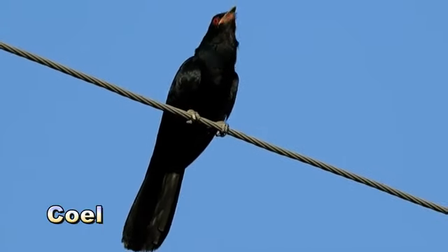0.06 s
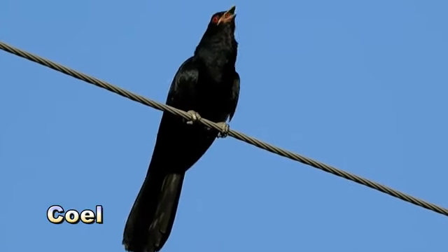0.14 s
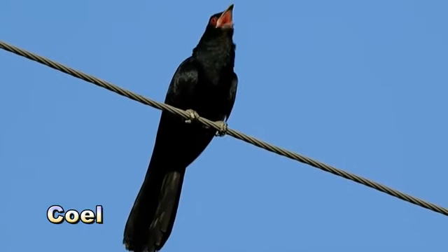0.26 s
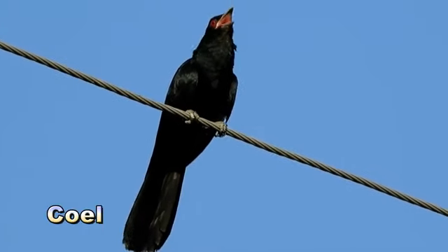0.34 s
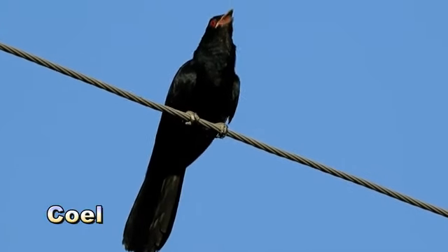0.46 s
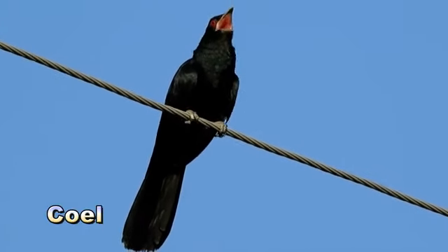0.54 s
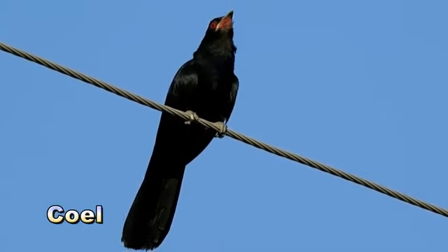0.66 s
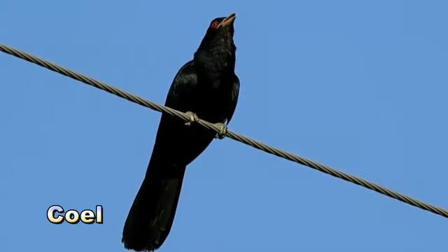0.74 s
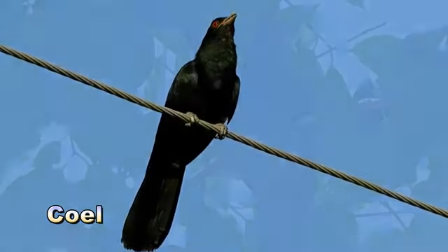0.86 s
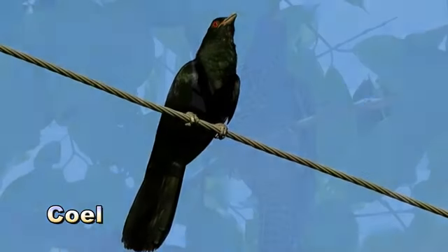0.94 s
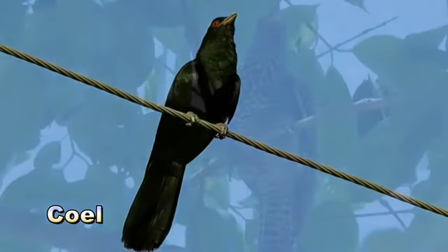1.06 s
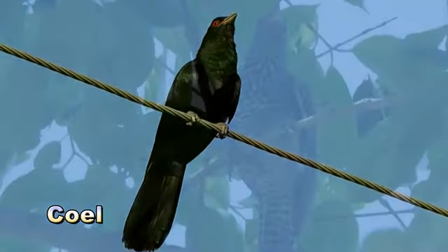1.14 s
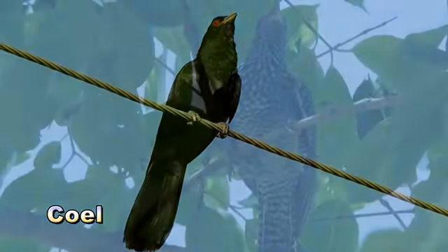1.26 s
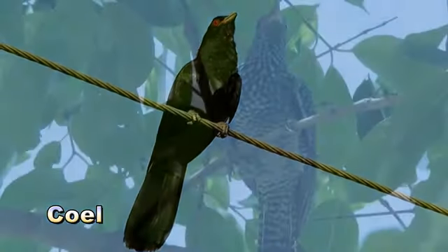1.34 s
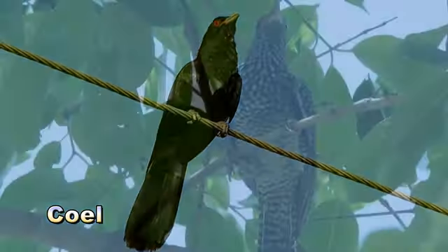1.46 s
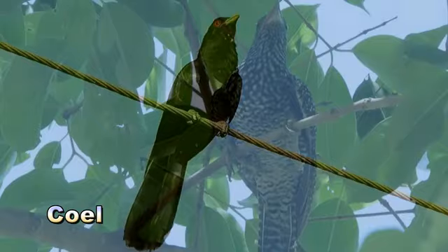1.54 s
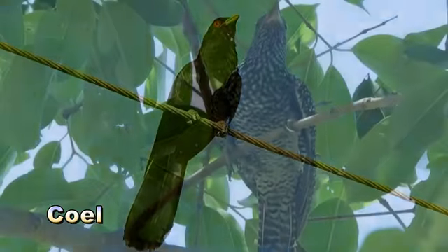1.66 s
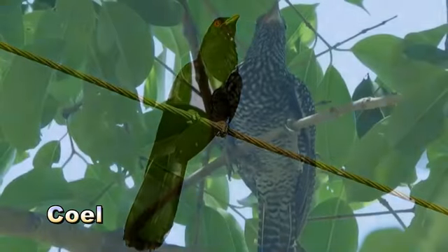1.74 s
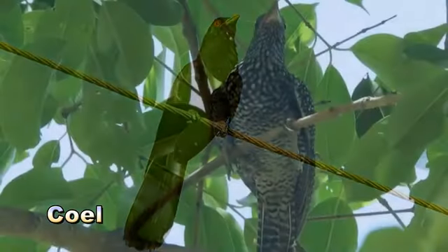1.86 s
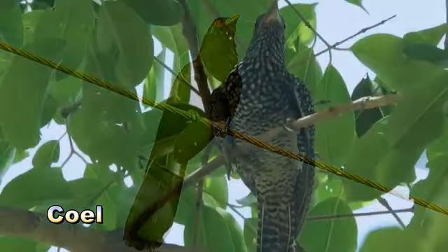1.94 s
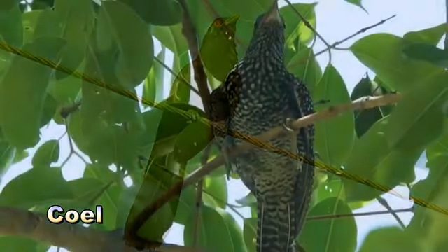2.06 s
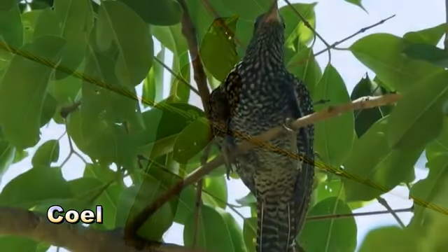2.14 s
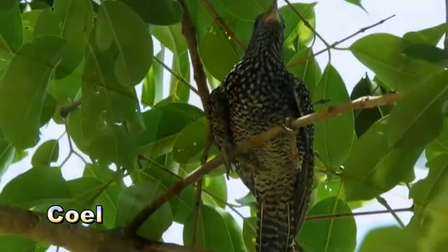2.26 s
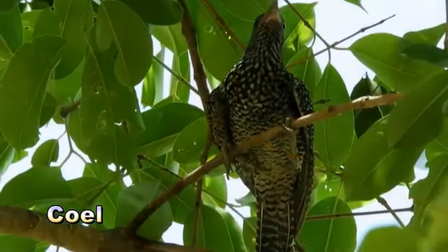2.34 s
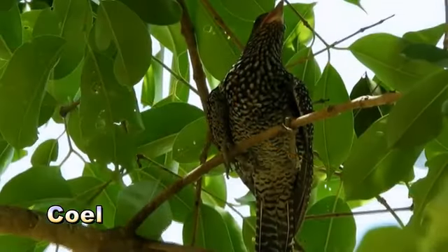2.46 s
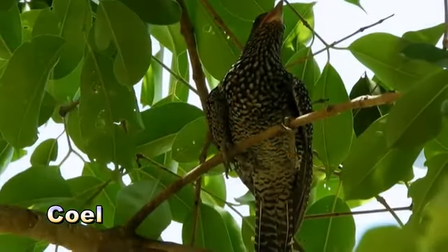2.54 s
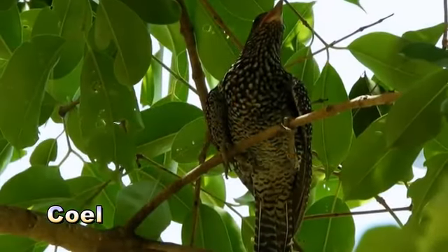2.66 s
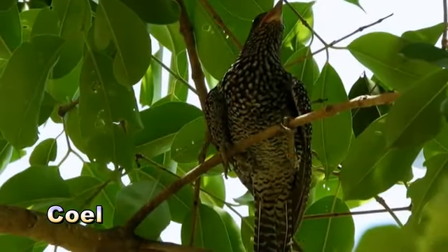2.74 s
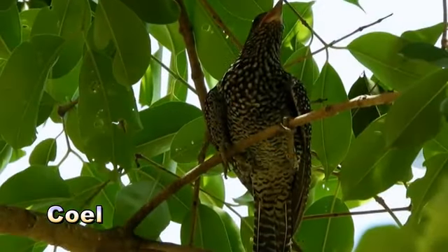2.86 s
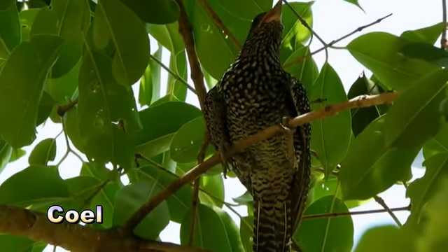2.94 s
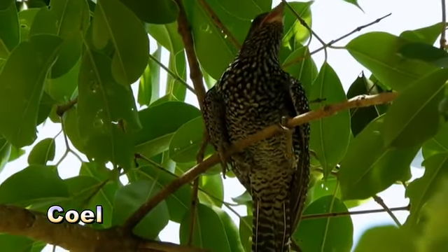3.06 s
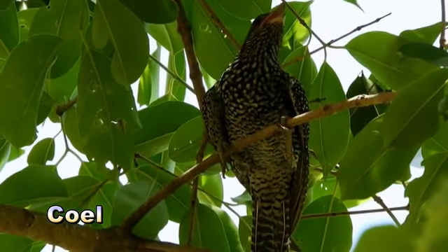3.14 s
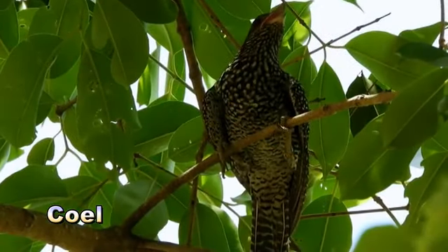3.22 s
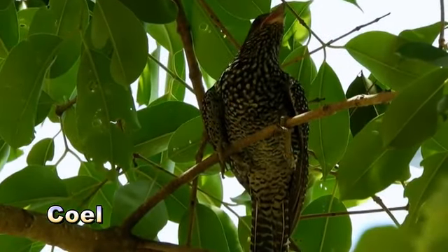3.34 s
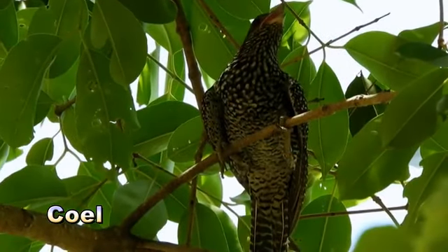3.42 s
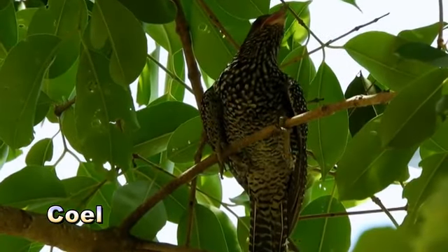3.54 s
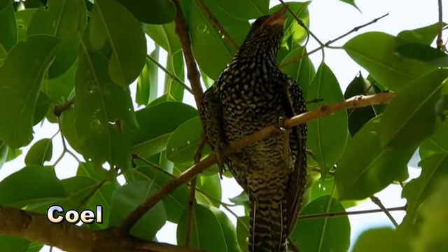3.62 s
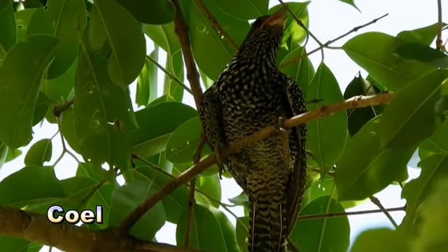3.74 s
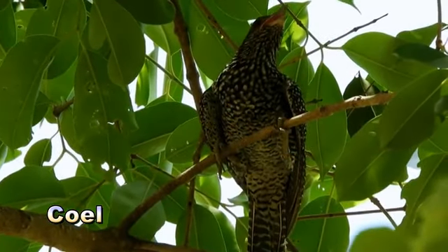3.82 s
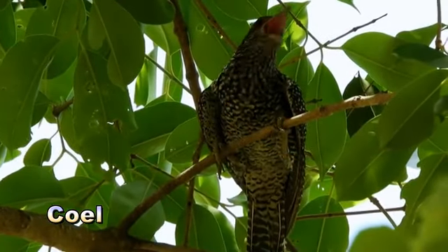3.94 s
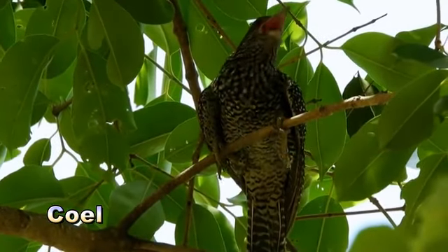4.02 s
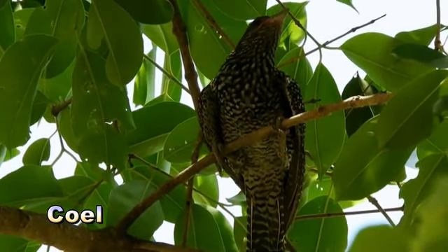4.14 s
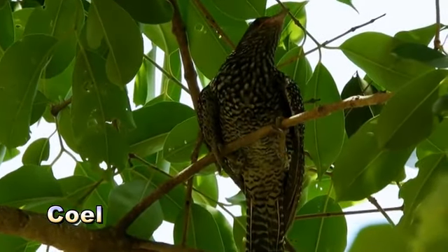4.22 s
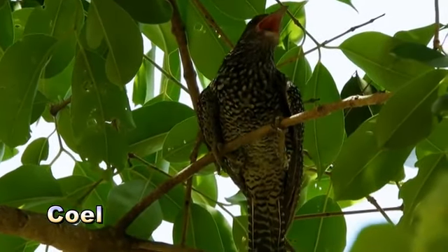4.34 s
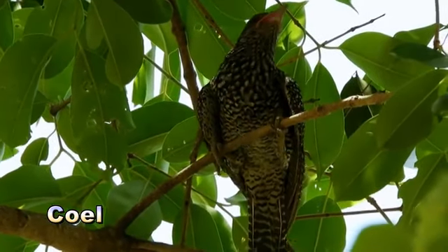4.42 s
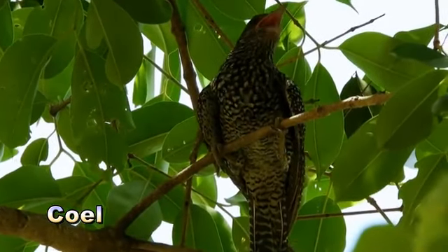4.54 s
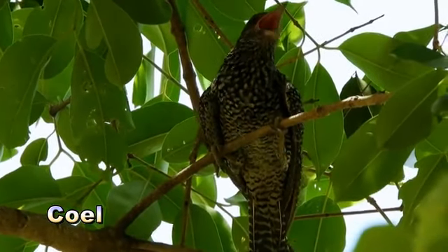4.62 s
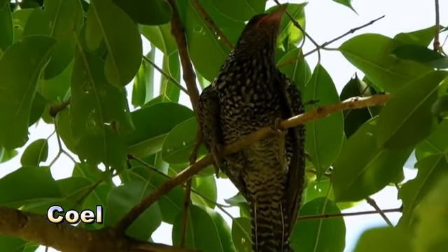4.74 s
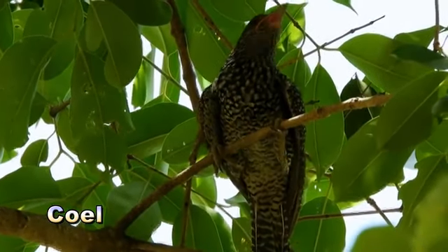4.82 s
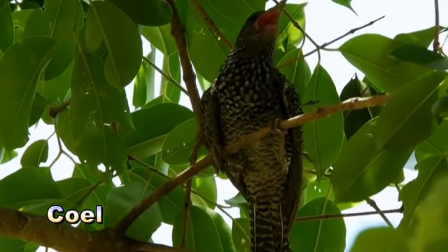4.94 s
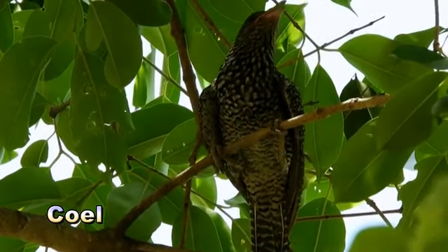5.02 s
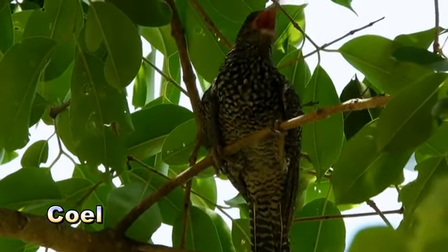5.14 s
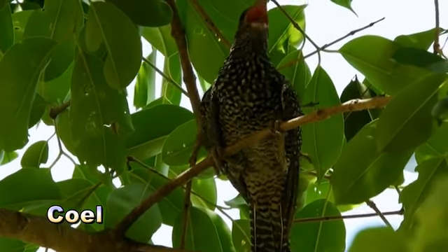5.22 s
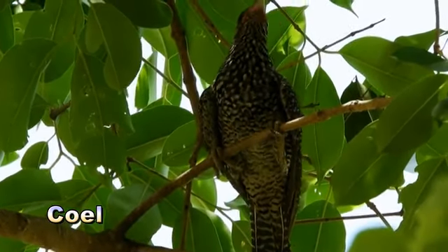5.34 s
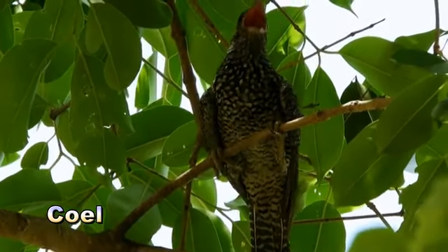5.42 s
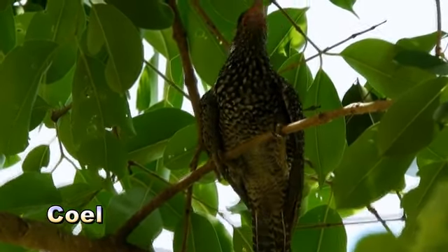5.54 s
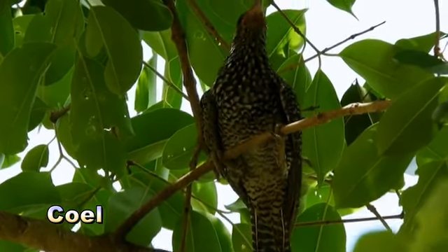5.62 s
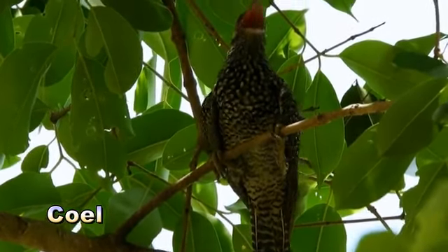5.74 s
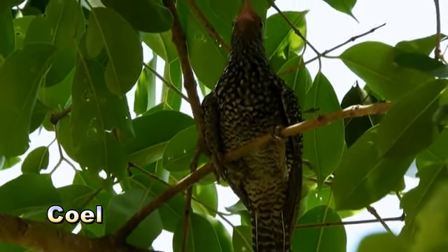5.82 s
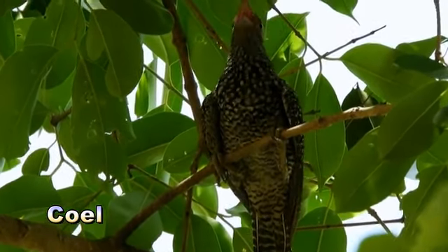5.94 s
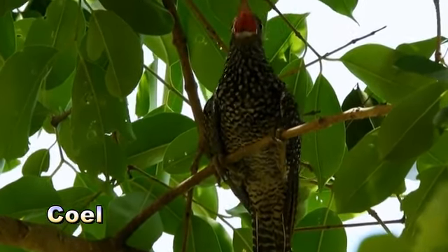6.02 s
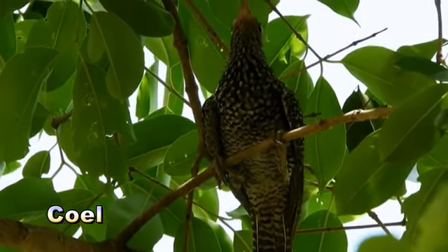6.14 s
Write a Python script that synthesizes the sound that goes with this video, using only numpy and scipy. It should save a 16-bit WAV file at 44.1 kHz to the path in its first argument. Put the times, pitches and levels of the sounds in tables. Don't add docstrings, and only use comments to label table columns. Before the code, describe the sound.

Outdoors, a loud cuckoo gives four clear two-note whistles, each slightly higher, echoing off nearby walls over a throbbing insect hiss. Tiny bird notes follow, then a brief dead silence. Under a tree, leaves rustle and faint chips repeat over soft hiss and rumble. A close bird chatters hoarsely, then bursts into seven quick, shrill double-arched shrieks, while a distant cuckoo answers through blurred echoes.

```python
import sys
import numpy as np
from scipy import signal
from scipy.fft import rfft, irfft
from scipy.io import wavfile
from scipy.ndimage import uniform_filter1d, minimum_filter1d

SR = 44100
rng = np.random.default_rng(int(sys.argv[2]) if len(sys.argv) > 2 else 0)


def how_loud(loudness_db):
    steps = np.asarray(loudness_db, float) / 20
    return 10 ** steps


def store_wav(level_fs):
    pcm = np.round(np.clip(np.atleast_2d(level_fs), -1, 1) * 32767)
    wavfile.write(sys.argv[1], SR, pcm.T.astype(np.int16))


N = 272538
LEAD = 8000

# [t/s, first note f/Hz, second note f/Hz, first level/dB, second level/dB]
WHISTLES = [
    (-.142, 1493, 1594, -13, -7),
    (.172, 1535, 1659, -7, -5.5),
    (.487, 1595, 1713, -9.5, -4.5),
    (0.807, 1631, 1735, -9, -6),
]
# [t/s, first arch f/Hz, notch f/Hz, second arch f/Hz, level/dB]
SHRIEKS = [
    (4.262, 2224, 1760, 2194, -13),
    (4.58, 2256, 1980, 2369, -13.5),
    (4.862, 2413, 2210, 2448, -10),
    (5.138, 2431, 2310, 2544, -10.5),
    (5.415, 2451, 2300, 2660, -8.5),
    (5.69, 2500, 2320, 2541, -9.5),
    (5.973, 2530, 2300, 2568, -11),
]
# [t/s, length/s, pitch f/Hz, level/dB, mouth as a factor on the throat]
RATTLES = [
    (3.448, .05, 1285, -29, 1.0),
    (3.548, .08, 1305, -29, 1.01),
    (3.66, .14, 1285, -29, .99),
    (3.725, .09, 1590, -35, 1.27),
    (4.055, .04, 1302, -29, .8),
    (4.16, .09, 1360, -29, .79),
]
# [t/s, length/s, pitch f/Hz, level/dB, mouth as a factor]
CLUCKS = [
    (3.362, .03, 1218, -34, .93),
    (3.8, .035, 1308, -29, .78),
    (3.885, .04, 1670, -32, 1.2),
]
# [t/s, length/s, first f/Hz, last f/Hz, level/dB]
SLIDE = [
    (3.812, .078, 2370, 2240, -30),
    (3.835, .05, 6950, 6800, -41),
]
# [f/Hz, level/dB]
WHISTLE_THROAT = [(1000, 3), (1700, -9.5), (2600, -41), (3400, -33), (4400, -44.5), (5000, -37),
                  (5600, -17.5), (6500, -25.5), (8200, -22.5), (10000, -31.5), (12000, -36.5), (15000, -50)]
SHRIEK_THROAT = [(1700, 4), (2100, 1), (2500, -0.5), (3500, -12), (4200, 2), (4700, -14.5), (5300, -20.5),
                 (6400, -15.5), (7400, -10.5), (9000, -21), (11500, -27.5), (15000, -49.5)]
CHATTER_THROAT = [(1200, -59), (2500, -4.5), (3300, -8), (3900, -14.5), (4600, -5.5), (5200, 0),
                  (6500, -5.5), (7800, -17.5), (10500, -25.5), (13000, -38.5)]
FAR_THROAT = [(800, -8.5), (1900, 4), (2600, -34.5), (3500, -8), (5000, -14.5), (6200, -16.5), (8000, -28),
              (15000, -51.5)]
# [t/s, length/s, first f/Hz, top f/Hz, level/dB]
FAR_HOOKS = [
    (5.02, .04, 1060, 1604, -61),
    (5.092, .19, 720, 1562, -47.5),
    (5.196, 0.059, 1574, 1905, -40.5),
    (5.31, 0.13, 1147, 1697, -45),
]
# [t/s, length/s, top f/Hz, last f/Hz, level/dB]
FAR_ARCHES = [
    (5.563, 0.092, 1330, 900, -43),
    (5.776, .15, 1370, 1040, -41),
    (5.987, 0.098, 1297, 1240, -46.5),
    (6.078, .105, 1510, 1120, -41.5),
]
# [t/s, length/s, first f/Hz, last f/Hz, level/dB]
SMALL_BIRDS = [
    (1.07, .18, 6910, 6890, -48),
    (1.135, .05, 6400, 3500, -48),
    (1.405, .03, 2900, 3020, -46),
    (1.3, .07, 2050, 2200, -57),
    (5.88, .09, 2450, 2300, -40),
]
CHIP_STARTS = [2.199, 2.464, 2.731, 2.997, 3.267, 3.531]
# [t/s from its start, length/s, first f/Hz, last f/Hz, level/dB]
CHIP_PHRASE = [
    (-.085, 0.009, 4580, 4640, -57),
    (-.06, 0.0163, 5330, 5220, -61),
    (-.035, 0.0174, 4084, 3860, -60),
    (-.005, .012, 6400, 5800, -54),
    (0.005, 0.0242, 4800, 4570, -55),
]
# [t/s, length/s, centre f/Hz, width f/Hz, level/dB]
RUSTLES = [
    (1.89, 0.052, 5500, 2510, -49.5),
    (1.939, 0.082, 5410, 2163, -45),
    (2.435, 0.032, 4680, 1290, -46),
]
# [f/Hz, level/dB per Hz]
YARD_AIR = [(25, -50.5), (50, -38), (85, 0), (220, -14), (900, -25), (1350, -5), (2000, -20.5),
            (5600, -23.5), (6200, -7.5), (7000, -14.5), (8300, 4.5), (9100, -6.5), (10000, -50),
            (11500, -49.5), (12200, -15), (14000, -47)]
TREE_AIR = [(15, -47), (25, -30), (64, 3), (173, 5), (421, -10), (631, -10.5), (919, -10), (1240, -11.5),
            (4380, -13.5), (4750, -10.5), (6550, -16), (8580, 1.5), (10600, -21.5), (12800, -21),
            (15500, -65.5)]
# [t/s, level/dB]
TREE_LEVEL = [(1.734, -50), (1.9, -47), (2.2, -45), (2.7, -44), (3.298, -44.5), (4.199, -44),
              (4.418, -48.5), (4.901, -49.5), (5.3, -51), (6.18, -53)]
# [f/Hz, likeness]
YARD_SAME = [(60, 1), (240, 0.4), (950, 0.46), (3770, 0.5), (15000, -1.5)]
TREE_SAME = [(60, 1), (240, 0.31), (950, 0.38), (3770, -0.032), (15000, -0.47)]
# [f/Hz, level/dB]
YARD_PAN = [(60, -2.5), (240, 0.5), (950, 0.5), (3770, -1), (15000, -7)]
TREE_PAN = [(60, 1), (240, -1.5), (950, -0.5), (3770, 0.5), (15000, -5)]
WHISTLER_PAN = [(60, -4.5), (180, -6), (550, 6), (1650, -2.5), (4970, 0.5), (15000, 1)]
SHRIEKER_PAN = [(60, 22), (180, -8), (550, 14), (1650, -0.5), (4970, -0.5), (15000, -5)]
# [delay t/s, left level/dB, right level/dB]
YARD_WALLS = [(.009, -21, -1), (0.022, -5, -27.5), (0.035, -8.5, -2.5), (0.057, -38.5, -39)]
TREE_WALLS = [(.004, -14, -21), (.012, -16, -11), (.027, -15, -19)]
# [f/Hz, t/s]
YARD_RING = [(500, 0.5), (1400, 0.57), (3000, 0.55), (8000, 0.51)]
TREE_RING = [(500, 0.2), (2400, 0.24), (4500, 0.27), (7500, 0.27), (11000, 0.27)]
CUT = (1.642, 1.735)
# [f/Hz, level/dB]
HEARING = [(100, -110), (9400, -105), (10300, -88.5), (11400, -94.5), (12300, -100), (13300, -90),
           (14500, -86)]


def whistle(s, first_hz, second_hz, first_db, second_db):
    return [(s, .9 * first_hz, first_db - 3),
            (s + .013, .96 * first_hz, first_db),
            (s + .049, first_hz, first_db),
            (s + .074, .93 * first_hz, first_db - 6),
            (s + .134, second_hz, second_db),
            (s + .152, .94 * second_hz, second_db),
            (s + .19, 1281, second_db - 9),
            (s + .23, 1072, second_db - 32)]


def shriek(s, first_hz, notch_hz, second_hz, db):
    stretch = 1 + .7 * (first_hz - 2250) / 1000
    octaves = np.log2(first_hz / notch_hz)
    choke_db, rebound_db = 42 * octaves, 12 * octaves
    tire_s = s + stretch * .084
    return [(s, .8 * first_hz, db - 22),
            (s + .01, .96 * first_hz, db - 3.5),
            (s + .018, first_hz, db - 1.5),
            (s + stretch * .038, notch_hz, db - choke_db),
            (s + stretch * .057, second_hz, db + rebound_db),
            (tire_s, .972 * first_hz, db - 1.5 + rebound_db),
            (tire_s + .011, .85 * first_hz, db - 22)]


def chatter(s, length, pitch_hz, db, mouth, throbs, slide_hz):
    slide = slide_hz * (mouth - 1)
    first_hz, last_hz = pitch_hz - slide / 2, pitch_hz + slide / 2
    rows = [(s, first_hz, db - 3),
            (s + .6 * length, .4 * first_hz + .6 * last_hz, db),
            (s + length, last_hz, db - 5)]
    throat = [(hz * mouth, gain_db) for hz, gain_db in CHATTER_THROAT]
    note = voice(rows, throat, wobble=.006, breath=.05, broken_db=3)[1]
    note = note + .22 * np.std(note) * hiss(len(note), 2000, 8000)
    t = np.arange(len(note)) / SR
    beat = (throbs * t * (1 + .096 * drift(len(note), count=900))) % 1
    opening = np.clip(beat / .12, 0, 1)
    closing = np.clip((.66 - beat) / .25, .22, 1)
    return s, note * opening * closing


def voice(rows, throat, wobble=.002, breath=.03, broken_db=0., dulling_db=0.):
    s, hz, db = np.transpose(rows)
    t = np.arange(s[0], s[-1], 1 / SR)
    size = len(t)
    hz = uniform_filter1d(np.interp(t, s, hz), size=260, mode="nearest")
    hz = hz * (1 + wobble * drift(size, count=60))
    turn = 2 * np.pi * np.cumsum(hz) / SR
    age = np.linspace(-.5, .5, size)
    tone = np.zeros(size)
    for k in range(1, 12):
        level_db = read(throat, k * hz) - (k + 1.5) * dulling_db * age
        level_db = level_db + (k > 1) * broken_db * drift(size, count=200)
        breathing = 1 + breath * (k - 1) * drift(size, count=24)
        audible = k * hz < 15600
        tone += how_loud(level_db) * audible * breathing * np.cos(k * turn + k * k)
    effort = how_loud(np.interp(t, s, db))
    return s[0], np.sqrt(2) * effort * tone * signal.windows.tukey(size, .06)


def hook(s, length, first_hz, top_hz, db):
    return [(s, first_hz, db - 3), (s + .022, top_hz, db), (s + length, top_hz - 900 * length, db - 12)]


def arch(s, length, top_hz, last_hz, db):
    knee_hz = top_hz - .35 * (top_hz - last_hz)
    return [(s, .93 * top_hz, db), (s + .53 * length, top_hz, db - 10),
            (s + .65 * length, knee_hz, db), (s + length, last_hz, db - 8.5)]


def pipe(s, length, first_hz, last_hz, db):
    hz = np.linspace(first_hz, last_hz, int(length * SR))
    tone = np.sin(2 * np.pi * np.cumsum(hz) / SR)
    return s, how_loud(db) * tone * signal.windows.tukey(len(hz), .5)


def rustle(s, length, centre_hz, width_hz, db):
    size = int(length * SR)
    snaps = rng.standard_normal(size) * how_loud(4.2 * drift(size, count=100))
    edges = [centre_hz - width_hz / 2, centre_hz + width_hz / 2]
    band = signal.butter(4, edges, "band", fs=SR, output="sos")
    return s, how_loud(db) * evened(signal.sosfilt(band, snaps)) * np.hanning(size)


def space(x, walls, ring, tail_db, same):
    noise = rng.standard_normal((2, SR))
    noise[1] = same * noise[0] + np.sqrt(1 - min(same, 1) ** 2) * noise[1]
    hz, t, z = signal.stft(noise, SR, nperseg=128)
    decay = how_loud(-60 * t / read(ring, hz)[:, None])
    tail = signal.istft(z * decay, SR, nperseg=128)[1]
    tail *= np.clip(np.arange(tail.shape[1]) / 300, 0, 1)
    tail *= how_loud(tail_db) / np.linalg.norm(tail[0])
    tail[:, 0] = 1
    for s, left_db, right_db in walls:
        i = round(s * SR)
        tail[0, i] += how_loud(left_db)
        tail[1, i + 1] += how_loud(right_db)
    return signal.fftconvolve(x[None], tail, axes=1)[:, LEAD:LEAD + N]


def shaded(x, pan):
    db = read(pan, np.fft.rfftfreq(N, 1 / SR))
    return irfft(rfft(x) * how_loud(np.outer([.5, -.5], db)), N)


def air(colour, same, pan, patchy_db):
    frames, hz = N // 256 + 5, np.fft.rfftfreq(1024, 1 / SR)
    a, b, c, d, patches = rng.standard_normal((frames, 513, 5)).T
    patches = uniform_filter1d(patches, size=10, axis=0)
    patches = evened(uniform_filter1d(patches, size=12, axis=1))
    like = np.clip(read(same, hz), -1, 1)[:, None]
    left = a + 1j * b
    right = like * left + np.sqrt(1 - like ** 2) * (c + 1j * d)
    z = np.array([left, right]) * how_loud(read(colour, hz)[:, None] + patchy_db * patches)
    z *= how_loud(np.outer([.5, -.5], read(pan, hz)))[:, :, None]
    return evened(signal.istft(z, nperseg=1024, noverlap=768)[1][:, :N])


def insect_air():
    floor = air(YARD_AIR, YARD_SAME, YARD_PAN, patchy_db=1.2)
    band = signal.butter(2, [7000, 9500], "band", fs=SR, output="sos")
    insects = signal.sosfilt(band, floor)
    return how_loud(-36.5) * (floor + .5 * insects * np.cos(2 * np.pi * 52 * np.arange(N) / SR))


def hiss(size, low_hz, high_hz):
    band = signal.butter(4, [low_hz, high_hz], "band", fs=SR, output="sos")
    return evened(signal.sosfilt(band, rng.standard_normal(size)))


def drift(size, count):
    once = uniform_filter1d(rng.standard_normal(size), count)
    return evened(uniform_filter1d(once, count))


def evened(x):
    return x / np.sqrt(np.mean(x ** 2) + 1e-20)


def read(points, hz):
    f, value = np.transpose(points)
    return np.interp(np.log(hz + 1), np.log(f + 1), value)


def add(mix, s, sound):
    part = mix[round(s * SR) + LEAD:][:len(sound)]
    part += sound[:len(part)]


def yard():
    cuckoo, far = np.zeros((2, N + LEAD))
    for row in WHISTLES:
        add(cuckoo, *voice(whistle(*row), WHISTLE_THROAT, wobble=.0008, breath=.05, broken_db=2.5))
    for row in SMALL_BIRDS[:4]:
        add(far, *pipe(*row))
    near_sound = shaded(space(cuckoo, YARD_WALLS, YARD_RING, tail_db=-6.0, same=.87), WHISTLER_PAN)
    far_sound = space(far, YARD_WALLS, YARD_RING, tail_db=6.5, same=.29)
    return near_sound + far_sound + insect_air()


def tree():
    near, far = np.zeros((2, N + LEAD))
    for row in SHRIEKS:
        add(near, *voice(shriek(*row), SHRIEK_THROAT, wobble=.003, breath=.16, broken_db=4.5,
                         dulling_db=2.5))
    for row in RATTLES:
        add(near, *chatter(*row, throbs=67, slide_hz=150))
    for row in CLUCKS:
        add(near, *chatter(*row, throbs=14, slide_hz=600))
    for row in SLIDE:
        add(near, *pipe(*row))
    answers = [hook(*row) for row in FAR_HOOKS] + [arch(*row) for row in FAR_ARCHES]
    for rows in answers:
        add(far, *voice(rows, FAR_THROAT, wobble=.0038, breath=.59))
    add(far, *pipe(*SMALL_BIRDS[4]))
    for start in CHIP_STARTS:
        for s, *rest in CHIP_PHRASE:
            add(far, *pipe(start + s, *rest))
    for row in RUSTLES:
        add(far, *rustle(*row))
    near_sound = shaded(space(near, TREE_WALLS, TREE_RING, tail_db=-6.5, same=.2), SHRIEKER_PAN)
    far_sound = space(far, TREE_WALLS, TREE_RING, tail_db=7.0, same=.45)
    level = how_loud(np.interp(np.arange(N) / SR, *np.transpose(TREE_LEVEL)))
    return near_sound + far_sound + level * air(TREE_AIR, TREE_SAME, TREE_PAN, patchy_db=1.54)


def scene():
    return np.where(np.arange(N) / SR < np.mean(CUT), yard(), tree())


def masked(x, mask_db, upward_db, downward_db, grit_db):
    mid_side = np.array([x[0] + x[1], x[0] - x[1]]) / 2
    hz, t, z = signal.stft(mid_side, SR, nperseg=2048, noverlap=1024, boundary="even")
    edges = np.r_[12:96:4, 96:192:12, 192:740:24]
    band = np.searchsorted(edges, np.arange(len(hz)), "right") - 1
    band = np.clip(band, 0, len(edges) - 1)
    width = np.diff(edges, append=len(hz))[:, None]
    power = np.add.reduceat(abs(z) ** 2, edges, axis=1) / width
    level_db = 10 * np.log10(power + 1e-14)
    octaves = np.log2(edges[:, None] / edges)
    fall_db = np.maximum(upward_db * octaves, -downward_db * octaves)
    hidden_db = (level_db[0][None] - fall_db[:, :, None]).max(axis=1) - mask_db
    luck_db = 2.0 * rng.standard_normal(hidden_db.shape)
    keep = level_db > np.maximum(hidden_db, read(HEARING, hz[edges])[:, None]) + luck_db
    keep[:, 0] = True
    a, b = rng.standard_normal(z.shape + (2,)).transpose(3, 0, 1, 2)
    grit = how_loud(level_db[:, band] + grit_db) * (a + 1j * b)
    z = (z + grit) * keep[:, band]
    mid, side = signal.istft(z, SR, nperseg=2048, noverlap=1024)[1][:, :N]
    return np.array([mid + side, mid - side])


def spray(dry):
    loud = np.sqrt(abs(uniform_filter1d(dry ** 2, size=600, axis=1)))
    yard_hiss = how_loud(-36) * hiss(dry.shape, 4200, 6000) + how_loud(-31) * hiss(dry.shape, 2100, 3300)
    yard_hiss = yard_hiss + how_loud(-46) * hiss(N, 300, 1100)
    tree_hiss = how_loud(-33) * hiss(dry.shape, 3500, 4700) + how_loud(-36) * hiss(dry.shape, 5900, 7600)
    tree_hiss = tree_hiss + how_loud(-39) * hiss(N, 230, 1800)
    return loud * np.where(np.arange(N) / SR < CUT[0], yard_hiss, tree_hiss)


def limited(x):
    peak = -minimum_filter1d(-abs(x).max(axis=0), size=400)
    return x / np.maximum(uniform_filter1d(peak, size=200) / .9, 1)


def top_cut(x):
    return signal.sosfilt(signal.butter(12, 15670, fs=SR, output="sos"), x)


def record(dry):
    x = masked(dry + spray(dry), mask_db=38, upward_db=8, downward_db=27.5, grit_db=-17)
    t = np.arange(N) / SR
    outside_cut = np.clip(np.maximum(CUT[0] - t, t - CUT[1]) * 300, 0, 1)
    mix = limited(x) * outside_cut
    return top_cut(mix)


dry = scene()
out = record(dry)
store_wav(out)
```